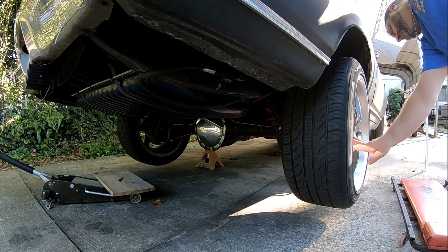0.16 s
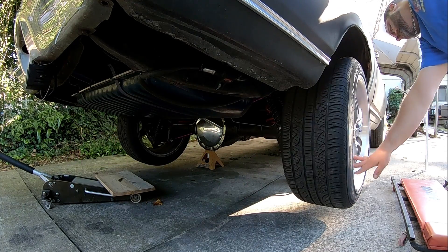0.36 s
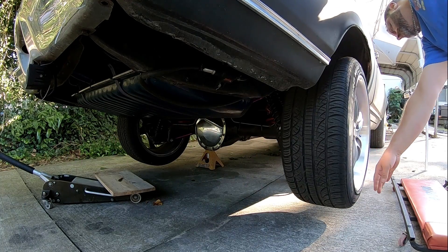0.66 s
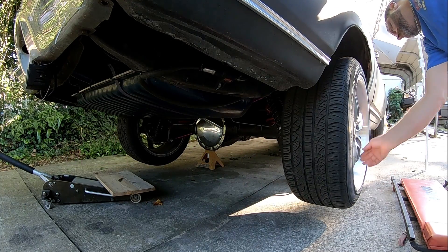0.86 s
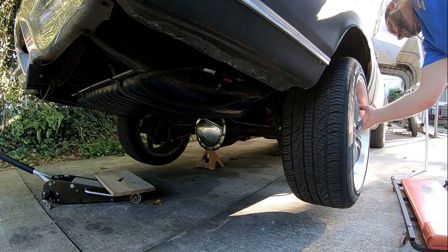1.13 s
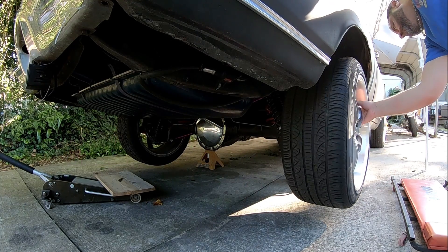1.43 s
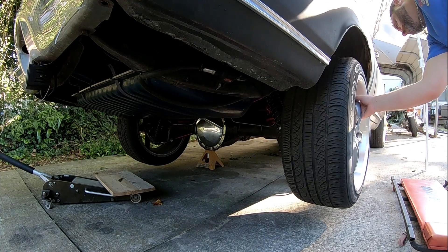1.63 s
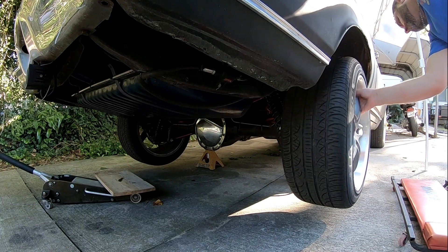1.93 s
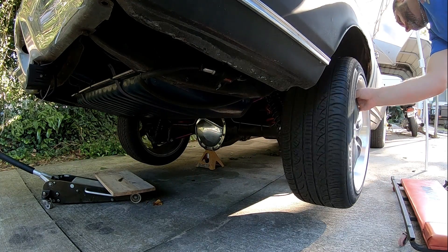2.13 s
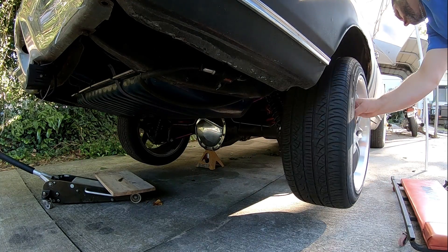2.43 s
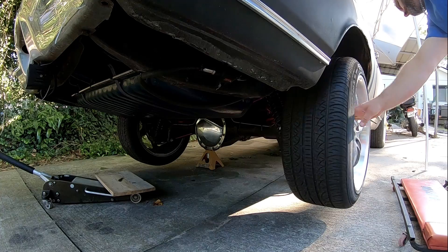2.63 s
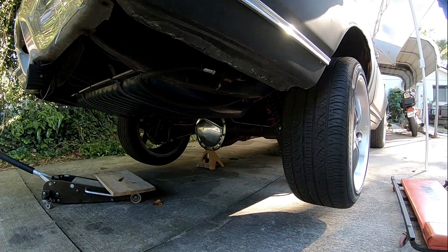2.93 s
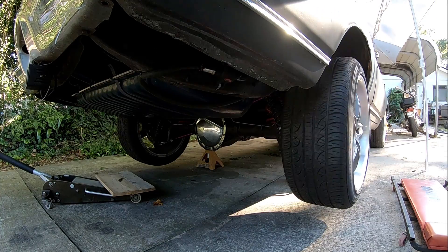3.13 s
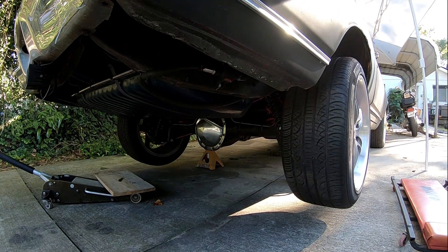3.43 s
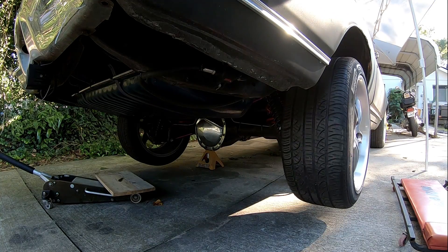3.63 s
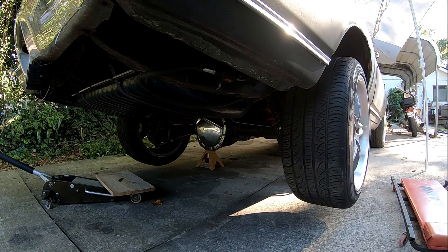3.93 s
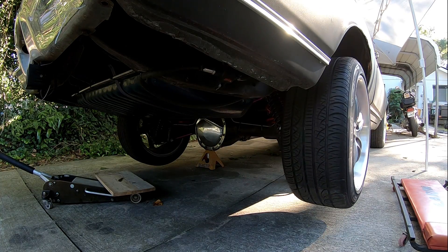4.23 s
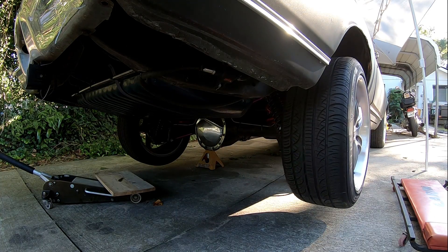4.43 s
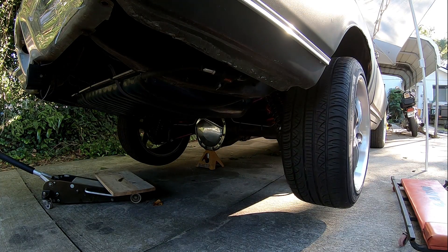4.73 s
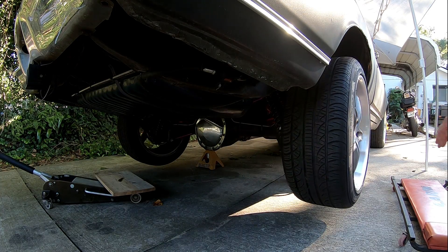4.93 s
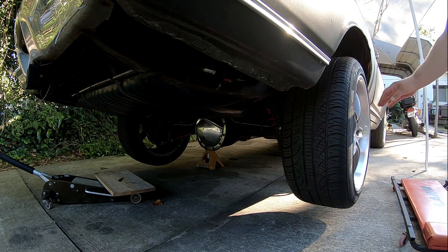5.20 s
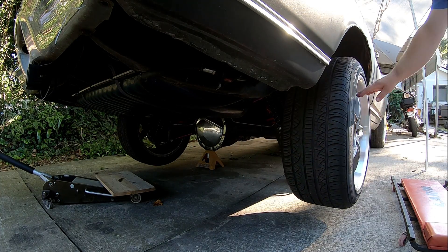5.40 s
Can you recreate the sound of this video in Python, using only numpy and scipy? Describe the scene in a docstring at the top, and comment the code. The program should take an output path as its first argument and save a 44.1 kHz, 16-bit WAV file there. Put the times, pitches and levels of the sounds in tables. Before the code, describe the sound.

In an open driveway, a low rumble like a distant motor climbs slowly. A raised car wheel is turned by hand, its brake rubbing and hissing, and almost at once worn gears close with a loud ringing clunk. A quieter second spin follows with hand rubs, taps, faint even chirps and thin squeals, then light double knocks. A stereo microphone stands close by, near the ground.

```python
"""A deep rumble, as of a motor some way off, climbs slowly while a car's jacked-up rear wheel
is turned by hand in a driveway against a hissing brake.
The rumble is a set of rising tones over a dull grind; the brake is filtered noise with thin wavering squeals.
Once the slack in the gears closes with a loud clunk, made of noise bursts and ringing modes.
Light rubs, taps, knocks and faint chirps follow, over open air and a steady hum, heard at two microphone ports."""
import sys
import numpy as np
from scipy import signal
from scipy.fft import rfft, irfft, next_fast_len
from scipy.io import wavfile

SR = 44100
rng = np.random.default_rng(int(sys.argv[2]) if len(sys.argv) > 2 else 0)


def to_wav(sig):
    """Store sig (one row per channel, or 1-D mono) as 16-bit WAV at the path in sys.argv[1].

    Samples outside -1..1 are clipped; the rate is SR.
    """
    pcm = np.clip(np.atleast_2d(sig), -1, 1) * 32767
    pcm = np.round(pcm).astype(np.int16)
    wavfile.write(sys.argv[1], SR, pcm.T)  # frames by channels


N = 245195
TIME = np.arange(N) / SR  # seconds


def from_db(db):
    """Decibels to amplitude gain."""
    return 10 ** (np.asarray(db) / 20)


def rms_one(x):
    """Scale to unit power."""
    return x / np.sqrt(np.mean(x ** 2) + 1e-20)


def at_hz(points, hz):
    """Read a frequency table, interpolating along log frequency."""
    table_hz, value = np.transpose(points)
    return np.interp(np.log(hz + 1e-3), np.log(table_hz), value)


def shaped(x, response):
    """Filter by a gain given as a function of frequency."""
    size = next_fast_len(N + SR // 10)
    hz = np.arange(size // 2 + 1) * SR / size
    return irfft(rfft(x, size) * response(hz), size)[..., :N]


def drift(rate_hz):
    """Slow random wander of unit power, fading out above the given rate."""
    return rms_one(shaped(rng.standard_normal(N), lambda hz: 1 / (1 + (hz / rate_hz) ** 2)))


# How alike the two microphone sides are. Each row: frequency in Hz, likeness from 0 to 1.
LIKENESS = [(100, 1), (250, 0.4), (600, 0.52), (2200, 0.76), (5000, 0.35), (10000, 0.12)]


def noise(colour):
    """Stereo noise of unit power; a shared and an opposed part set how alike the sides are at each frequency."""
    gain = lambda hz: from_db(at_hz(colour, hz))
    alike = lambda hz: np.clip(at_hz(LIKENESS, hz), 0, 1)
    mid = shaped(rng.standard_normal(N), lambda hz: gain(hz) * np.sqrt(1 + alike(hz)))
    side = shaped(rng.standard_normal(N), lambda hz: gain(hz) * np.sqrt(1 - alike(hz)))
    return rms_one(mid + side * np.array([[1], [-1]]))


def split(x, edge_hz):
    """The parts below and above an edge."""
    low = shaped(x, lambda hz: 1 / (1 + (hz / edge_hz) ** 12))
    return low, x - low


def tone(hz):
    """A sine of unit power on a pitch curve."""
    return np.sqrt(2) * np.sin(2 * np.pi * np.cumsum(hz) / SR)


def blow(start, rise, t60, hold=0):
    """Envelope that rises, holds and dies by 60 dB per t60; all times in seconds."""
    age = TIME - start
    decay_db = -60 * np.clip((age - hold) / t60, 0, 3)
    return np.clip(age / rise, 0, 1) * from_db(decay_db)


def swell(start, length):
    """A rounded envelope."""
    return np.sqrt(np.abs(np.sin(np.pi * np.clip((TIME - start) / length, 0, 1))))


def swell_and_fade(peak, rise, fall):
    """A soft-edged envelope with its own pace on each side of the peak."""
    distance = np.abs((TIME - peak) / np.where(TIME < peak, rise, fall)).clip(0, 6)
    return np.exp(-distance ** 2 / 2)


def swells(rows):
    """Sum of rounded envelopes from rows of start in seconds, length in seconds, level in dB."""
    return sum(from_db(db) * swell(start, length) for start, length, db in rows)


def ring(modes, start, rise):
    """Decaying sine modes set ringing at one moment."""
    return sum(from_db(db) * blow(start, rise, t60) * np.sin(2 * np.pi * hz * (TIME - start))
               for hz, db, t60 in modes)


def underbody(x, ripple_db=3.5, ripple_hz=68.85):
    """Many short paths between floor pan and concrete, drawn as a random ripple in the spectrum."""
    steps = np.arange(0, SR, ripple_hz)
    ripple = rng.standard_normal(4096)[:len(steps)]
    return rms_one(shaped(x, lambda hz: from_db(ripple_db * np.interp(hz, steps, ripple))))


# Brake drum resonances. Each row: centre in Hz, width in Hz, lift in dB.
DRUM = [(872, 60, -0.5), (1570, 36, -1), (1850, 76, 4), (2136, 40, 6), (2560, 47, 4), (2700, 60, 5.5),
        (3320, 64, 1.5), (3850, 81, 2), (6280, 120, 3), (6830, 37, 6)]


def through_drum(x):
    """Rubbing noise picks up the narrow resonances of the drum and leaves from under the car."""
    lift_db = lambda hz: sum(db / (1 + (2 * (hz - centre) / width) ** 2) for centre, width, db in DRUM)
    return underbody(shaped(x, lambda hz: from_db(lift_db(hz))))


# Dull grind in the rumble. Each row: frequency in Hz, relative spectral level in dB per Hz.
RUMBLE_COLOUR = [(20, -10.5), (38, -9.5), (48, -8.5), (60, 1.5), (100, 0.5), (135, -6), (165, -17),
                 (205, -14.5), (260, -27), (340, -29.5), (450, -36), (900, -75.5), (6000, -110)]
# Rumble level before the clunk. Each row: time in seconds, level in dB.
RUMBLE_BEFORE = [(0.0, -28.5), (0.02, -27.5), (0.138, -28.5), (0.158, -41.5), (0.35, -29.5)]
# Rumble level after the clunk. Each row: time in seconds, level in dB.
RUMBLE_AFTER = [(0.58, -31), (1.3, -32), (1.34, -39), (1.48, -26), (1.63, -39), (1.71, -29.5),
                (2.78, -26.5), (2.82, -38), (2.92, -26.5), (4.32, -26.5), (4.37, -23), (4.651, -29.5),
                (5.15, -25), (5.409, -32), (5.44, -26), (5.55, -18.5)]
# Tones of the rumble. Each row: multiple of the repeat rate, relative level in dB.
RUMBLE_ORDERS = [(3, -18), (4, -5), (5, -3), (6, -15), (7, -15), (8, -13.5), (9, -20)]
# Single orders swell for a while. Each row: start in seconds, length in seconds, multiple, lift in dB.
SURGES = [(2.75, .45, 9, 7), (2.999, .45, 5, 2.5), (3.45, .4, 7, 5.5), (4.247, .42, 4, 5.5),
          (4.3, 0.6, 9, 9), (4.838, .48, 5, 7), (4.801, .5, 6, 11.5), (4.799, .5, 7, 4.5)]


def rumble(wobble=0.006, uneven_db=2.5, orders_db=-0.5, grind_db=-5.0, upper_db=-28.5):
    """Low orders of a slowly rising repeat rate surge one by one, over a dull grind."""
    rate_hz = 12.8 + .55 * TIME
    times, levels = np.transpose(np.vstack([RUMBLE_BEFORE, RUMBLE_AFTER]))
    level_db = np.interp(TIME, times, levels)
    orders = 0
    for order, db in RUMBLE_ORDERS:
        surge_db = sum(lift * swell(start, length) for start, length, multiple, lift in SURGES
                       if round(multiple) == round(order))
        gain = from_db(db + surge_db + uneven_db * drift(7.7))
        orders = orders + gain * tone(round(order) * rate_hz * (1 + wobble * drift(5.26)))
    # the upper part of the grind keeps a steady level
    deep, upper = split(from_db(grind_db) * noise(RUMBLE_COLOUR), edge_hz=98)
    return from_db(level_db) * (from_db(orders_db) * orders + deep) + from_db(upper_db) * upper


def spin(start, pushed, stop, push_curve=1.4, coast_s=3.79, stop_t60_s=.3):
    """Drag builds during the push, falls evenly as the wheel coasts and dies when it is stopped."""
    push = np.clip((TIME - start) / (pushed - start), 0, 1) ** push_curve
    coast = np.clip(1 - (TIME - pushed) / coast_s, 0, 1)
    stop_db = -60 * np.clip((TIME - stop) / stop_t60_s, 0, 2)
    return push * coast * from_db(stop_db)


# Brake lining against drum. Each row: frequency in Hz, relative spectral level in dB per Hz.
DRAG_COLOUR = [(300, 2.5), (540, -10.5), (800, -7.5), (1000, -12.5), (1250, -2.5), (1900, -6), (3000, -6),
               (3900, -11.5), (4600, -19), (5600, -16), (6600, -17), (7600, -26.5), (9000, -38.5),
               (12500, -47.5), (16000, -74.5)]
# The wheel brought up to speed. Each row: start in seconds, end of the push in seconds, stop in seconds,
# brake drag at full speed in dB.
SPINS = [(-0.5, 0.305, 0.39, -47.5), (1.15, 2.006, 8, -55.5)]
# The lining whispers high up as the wheel slows. Each row: start in seconds, length in seconds, level in dB.
WHISPERS = [(3.834, 1, -67)]
# Brake squeals. Each row: start in seconds, length in seconds, pitch in Hz, level in dB,
# hoarseness as pitch spread in Hz.
SQUEALS = [(1.99, 0.18, 3270, -59.5, 85), (2.159, 0.11, 6330, -67.5, 110), (2.54, 0.17, 7390, -66.5, 25),
           (4.1, 0.21, 7000, -66, 120), (4.082, 0.51, 760, -66, 57), (4.59, 0.17, 6680, -62.5, 14),
           (4.34, 1.25, 2815, -76.5, 11)]


def brake(rub_db=0.5, hiss_db=-10.5, grain_db=1.53, squeal_flutter_db=4.0):
    """The lining rubs and hisses with the wheel's speed and now and then sings, falteringly, on one mode."""
    effort = sum(from_db(db) * spin(start, pushed, stop) for start, pushed, stop, db in SPINS)
    low, high = split(through_drum(noise(DRAG_COLOUR)), edge_hz=5570)
    rub = effort * from_db(rub_db + grain_db * drift(28)) * rms_one(low)
    hiss = np.hypot(effort * from_db(hiss_db), swells(WHISPERS)) * rms_one(high)
    waver = drift(350)
    grip = from_db(squeal_flutter_db * drift(60))
    squeals = sum(from_db(db) * swell(start, length) * tone(hz + spread * waver)
                  for start, length, hz, db, spread in SQUEALS)
    return rub + hiss + grip * squeals


# Gear clunk noise. Each row: frequency in Hz, relative spectral level in dB per Hz.
CLUNK_COLOUR = [(250, 0), (400, -6), (520, -9.5), (780, -3.5), (1000, -13.5), (1250, -7.5), (1850, -7),
                (2200, 3.5), (2600, -8), (2900, -10.5), (3450, -2.5), (5200, -11.5), (6600, -2.5),
                (7200, -5), (8000, -14), (8600, -11), (11000, -35), (14000, -38), (16000, -47.5)]
# Low thump under the clunk. Each row: frequency in Hz, relative spectral level in dB per Hz.
THUMP_COLOUR = [(30, -19.5), (70, -1.5), (130, 1), (260, -12), (330, -9.5), (420, -20), (600, -44),
                (2000, -90.5)]
# Gear faces meet and bounce. Each row: time in seconds, relative level in dB, treble against middle in dB.
IMPACTS = [(0.3664, -2.5, -5.5), (0.3713, -3, -2), (0.3708, -3.5, 7), (0.3749, -6.5, -6.5)]
# Ringing housing and wheel. Each row: frequency in Hz, relative level in dB, t60 in seconds.
STEEL = [(666, -3, .4), (795, -2, .33), (1706, -7, .52), (1762, -3, 0.34), (1838, -6, 0.28),
         (2052, -8, 0.48), (2128, 2, .3), (2180, -2, .42), (2250, 0, .42), (2275, -4, .36),
         (2324, -4, 0.44), (2438, -8, .3), (3475, -7, 0.2), (3580, -5, .17), (4775, -9, .2),
         (6594, -2, .15), (6890, -5, .18)]
# The gear's own clank, close beating modes. Each row: frequency in Hz, level in dB, t60 in seconds.
CLANK = [(2172, -17, .14), (2140, -20, .08), (2198, -21, .06)]
# Axle on its springs. Each row: frequency in Hz, level in dB, t60 in seconds.
AXLE = [(39, -24, .45), (70.85, -10, 0.72), (103, -16.5, 0.6), (124, -16.5, 0.49), (136.5, -21, 0.4),
        (177, -23.5, 0.34), (204.7, -23, 0.3), (272, -31.5, .25), (302, -32, 0.37), (322, -31, 0.24),
        (352.6, -34, 0.35)]


def clunk(crack_db=-14.0, near_db=-24.0, tail_db=-29.0, steel_db=-31.0, thump_db=-22.0):
    """Backlash closes: a bouncing crack, a clank, ringing steel, echoes under the body and a heavy shudder."""
    first = IMPACTS[0][0]
    middle, treble = split(noise(CLUNK_COLOUR), edge_hz=4300)
    crack = sum(from_db(db) * blow(s, 0.00068, 0.028) * (middle + from_db(treble_db) * treble)
                for s, db, treble_db in IMPACTS)
    echoes = underbody(noise(CLUNK_COLOUR), ripple_db=4.0, ripple_hz=40.14)
    low, high = split(echoes, edge_hz=3300)
    near = from_db(near_db) * blow(first, 0.0023, 0.19) * echoes
    tail = from_db(tail_db) * (blow(first, 0.0028, 0.53) * low + blow(first, 0.0056, 0.43) * high)
    thump = from_db(thump_db) * blow(first, 0.0066, 0.28) * noise(THUMP_COLOUR)
    steel = from_db(steel_db) * ring(STEEL, first, 0.0037)
    clank = ring(CLANK, first, 0.0032)
    shudder = ring(AXLE, first, 0.012)
    return from_db(crack_db) * crack + near + tail + thump + steel + clank + shudder


# Contact noise at the wheel. Each row: frequency in Hz, relative spectral level in dB per Hz.
SCUFF_COLOUR = [(130, 1), (230, 8), (330, 1.5), (480, -10.5), (680, -2), (1100, -3), (1800, -4.5),
                (3500, -14), (4800, -23.5), (6800, -11), (9000, -31), (13000, -47.5), (16000, -66.5)]


def grit(grain_db=2.5):
    """Gritty contact noise as thud, middle and treble."""
    grains = from_db(grain_db * drift(250))
    thud, rest = split(rms_one(through_drum(noise(SCUFF_COLOUR)) * grains), edge_hz=740)
    middle, treble = split(rest, edge_hz=4200)
    return thud, middle, treble


# The hand slides over the tyre. Each row: peak in seconds, rise in seconds, fall in seconds, relative level in dB,
# thud against the middle in dB.
RUBS = [(0.08, .02, 0.033, -47, 3), (0.345, .012, .02, -43, 3), (0.69, 0.025, .025, -53, -7.5),
        (1.365, 0.025, 0.041, -53.5, -9.5), (1.495, 0.04, .035, -47.5, -0.5),
        (1.625, 0.023, 0.024, -59.5, 0), (1.97, 0.0091, .02, -56.5, -6), (2.099, 0.03, 0.033, -46.5, -5.5),
        (2.45, .012, 0.028, -55, -7.5), (2.576, 0.02, .05, -50.5, -10), (3.13, 0.03, 0.063, -53.5, 1)]


def rubs(treble_db=-10.0, scrape_db=0.5):
    """Each slide of the hand swells and fades, scraping unevenly."""
    thud, middle, treble = grit()
    scrape = rms_one(from_db(scrape_db * drift(70)))
    bright = middle + from_db(treble_db) * treble
    return scrape * sum(from_db(db) * swell_and_fade(s, rise, fall) * (from_db(thud_db) * thud + bright)
                        for s, rise, fall, db, thud_db in RUBS)


# Light taps of hand and wheel. Each row: start in seconds, length in seconds, relative level in dB,
# treble against the middle in dB, thud against the middle in dB.
TAPS = [(1.0893, 0.006, -43.5, -7.5, -12), (1.599, 0.017, -58, 7.5, 1.5), (1.834, 0.021, -43.5, -10.5, 1),
        (1.913, .014, -48.5, -12, -9), (2.423, 0.016, -46, -21.5, 0), (3.253, 0.018, -56, 0, 1),
        (4.051, 0.014, -45.5, 7, 2.5), (4.428, 0.014, -50, -8, -3.5), (4.487, 0.013, -47.5, 6.5, 0.5),
        (4.499, 0.02, -47, 4.5, 1)]


def taps(attack_s=0.0028, tail_t60=0.082):
    """Short sharp contacts, each with a brief tail under the car."""
    thud, middle, treble = grit()
    out = 0
    for start, length, db, treble_db, thud_db in TAPS:
        contact = from_db(thud_db) * thud + middle + from_db(treble_db) * treble
        out = out + from_db(db) * blow(start, attack_s, tail_t60, hold=length) * contact
    return out


# The wheel knocks lightly against its play. Each row: time in seconds, level in dB.
KNOCKS = [(4.056, -55), (4.064, -54.5), (4.497, -42.5), (4.504, -53), (4.513, -42), (4.519, -48.5),
          (4.526, -59)]
# Hub modes. Each row: frequency in Hz, relative level in dB, t60 in seconds.
HUB = [(302, -9, 0.091), (623, -1.5, 0.06), (680, 0, 0.08), (795, -1.5, 0.06), (962, -3.5, 0.046),
       (1147, -5.5, 0.05), (1357, -5, 0.082), (1740, -7, 0.023), (2143, -5.5, 0.03)]


def knocks(uneven_db=5.0):
    """Each light knock rings the hub, every mode with a random strength of its own."""
    chance = uneven_db * rng.standard_normal((len(KNOCKS), len(HUB)))
    out, age = np.zeros(N), np.arange(SR // 4) / SR
    for (s, db), extra_db in zip(KNOCKS, chance):
        at = round(s * SR)
        for (hz, mode_db, t60), extra in zip(HUB, extra_db):
            decay = from_db(db + mode_db + extra - 60 * age / t60)
            out[at:at + len(age)] += decay * np.sin(2 * np.pi * hz * age)
    return out


# The tyre drums hollowly. Each row: start in seconds, length in seconds, level in dB.
BOOMS = [(0.0, 0.14, -35), (0.332, 0.043, -28.5), (1.506, 0.07, -33), (2.094, .15, -39.5),
         (2.376, 0.15, -44), (3.312, 0.17, -40.5), (5.092, 0.064, -43.5)]
# Air inside the tyre. Each row: frequency in Hz, relative spectral level in dB per Hz.
BOOM_COLOUR = [(60, -6.5), (140, -2.5), (185, -6.5), (208, 7), (232, -8), (330, -14.5), (480, -23.5),
               (700, -30.5), (1500, -58), (6000, -96)]


def booms():
    """The air in the tyre answers with short hollow swells."""
    return noise(BOOM_COLOUR) * swells(BOOMS)


# The skin catches on the rubber and slips. Each row: peak in seconds, level in dB.
CATCHES = [(1.339, -50.5), (1.452, -54), (1.972, -53.5), (2.077, -51.5), (2.556, -57)]
# Skin on rubber. Each row: frequency in Hz, relative spectral level in dB per Hz.
CATCH_COLOUR = [(400, -22), (900, -11), (1800, 4.5), (2600, -13), (4000, -26.5), (9000, -54)]


def catches(rise_s=0.0064, fall_s=0.0076):
    """Brief soft scrapes as skin catches and slips."""
    envelope = sum(from_db(db) * swell_and_fade(s, rise_s, fall_s) for s, db in CATCHES)
    return through_drum(noise(CATCH_COLOUR)) * envelope


# The coasting wheel murmurs hoarsely. Each row: start in seconds, length in seconds, level in dB.
ROLLS = [(2.249, 1.3, -62), (4.073, 0.72, -61.5)]
# Murmur of the rolling wheel. Each row: frequency in Hz, relative spectral level in dB per Hz.
ROLL_COLOUR = [(400, -15), (620, -4.5), (780, -8), (900, -3), (1200, -9), (1700, -17.5), (3000, -29.5),
               (9000, -66)]


def rolling(uneven_db=-1.0):
    """The coasting wheel murmurs unevenly in the middle range."""
    return through_drum(noise(ROLL_COLOUR)) * from_db(uneven_db * drift(18)) * swells(ROLLS)


def chirps(chirp_db=-67.5, uneven_db=1.5, pitch_hz=3775, waver_hz=50, count=13):
    """A faint, hoarse squeak repeats evenly, strongest halfway through its run."""
    first_s, every_s, length_s = 2.588, .1325, .05
    beats = sum(swell(first_s + every_s * k, length_s) for k in range(count))
    arch = swell(first_s, every_s * (count + 1))
    level = from_db(chirp_db + uneven_db * drift(60))
    return level * arch * beats * tone(pitch_hz + waver_hz * drift(200))


# Soft high rustles. Each row: start in seconds, length in seconds, level in dB.
RUSTLES = [(4.906, 0.1, -70), (5.331, .05, -64), (5.458, 0.045, -65.5), (5.503, 0.038, -65)]


def rustles():
    """Faint narrow swishes as the hand comes back to the wheel."""
    colour = [(1800, -29), (2700, -8.5), (3600, -3.5), (4600, -35.5), (9000, -57.0)]  # Hz, dB per Hz
    return noise(colour) * swells(RUSTLES)


# Open air in the driveway. Each row: frequency in Hz, relative spectral level in dB per Hz.
AIR_COLOUR = [(180, -27.5), (300, -1.5), (582, -10), (777, -4.5), (1250, -11.5), (1350, 0.5), (1430, -12),
              (2680, -13.5), (3630, -18.5), (6470, -19.5), (9410, -34), (12200, -56), (18000, -80.5)]
# Steady hum. Each row: frequency in Hz, level in dB, pitch wander in Hz.
HUM = [(234.4, -52.5, 1.7), (1350.7, -67, 4)]


def driveway(air_db=-64.0):
    """Open air as steady noise, and a hum of slightly wandering tones."""
    hum = sum(from_db(db) * tone(hz + wander * drift(32)) for hz, db, wander in HUM)
    return from_db(air_db) * noise(AIR_COLOUR) + hum


# Phase between the microphone ports. Each row: frequency in Hz, lead of the left in radians.
PORT_PHASE = [(20, 0.1), (130, -0.1), (260, -0.9), (400, -1.9), (520, -3.2), (780, -4.2), (1380, -4.6),
              (2300, -5.3), (3800, -5.8), (5500, -7.6), (6300, -6.5), (7000, -9), (9000, -9.6)]
# Balance of the microphone ports. Each row: frequency in Hz, left against right in dB.
PORT_BALANCE = [(60, 3), (170, 3), (320, -1.5), (560, -2.5), (1000, -2), (2500, -1.5), (5100, -2.5),
                (7000, -6), (9000, -6.5)]


def scene():
    """All sources, reaching the two microphone ports with different level and phase."""
    running = rumble() + brake() + rolling() + chirps()
    handling = rubs() + catches() + taps() + booms() + knocks() + rustles()
    sound = running + handling + clunk() + driveway()
    half_db = lambda hz: at_hz(PORT_BALANCE, hz) / 2
    left = shaped(sound[0], lambda hz: from_db(half_db(hz)) * np.exp(1j * at_hz(PORT_PHASE, hz)))
    right = shaped(sound[1], lambda hz: from_db(-half_db(hz)))
    return np.array([left, right])


def record(dry, top=1.0, cutoff_hz=16000):
    """The microphone rounds the highest peaks and the top of the spectrum is cut steeply."""
    rounded = dry / (1 + (dry / top) ** 4) ** (1 / 4)
    lowpass = signal.ellip(8, .1, 70, cutoff_hz, fs=SR, output="sos")  # ripple .1 dB, stopband 70 dB down
    return signal.sosfilt(lowpass, rounded)


dry = scene()
out = record(dry)
to_wav(out)
```